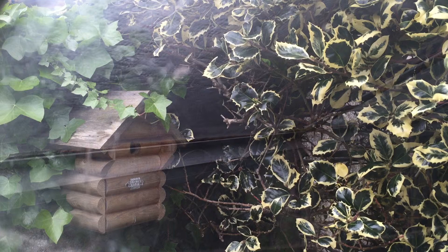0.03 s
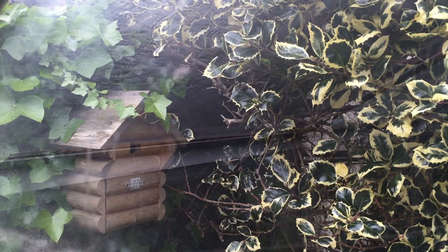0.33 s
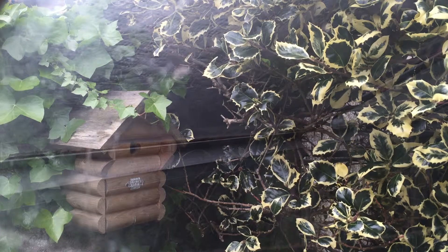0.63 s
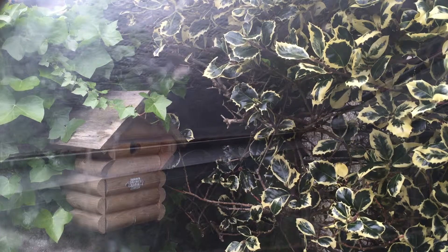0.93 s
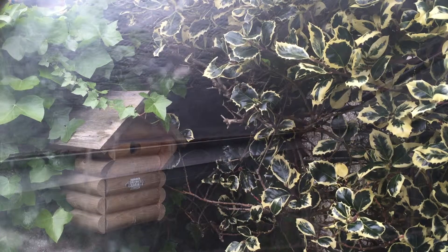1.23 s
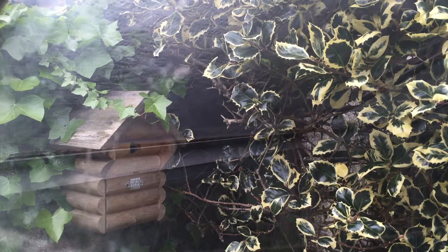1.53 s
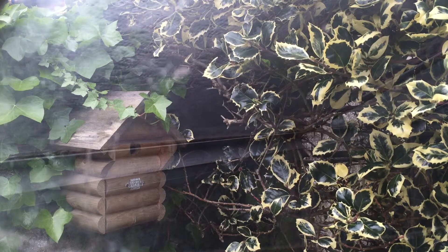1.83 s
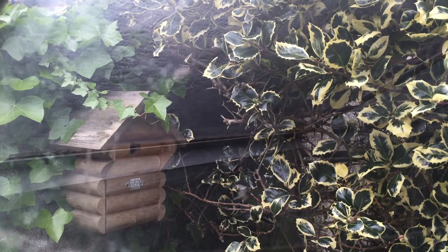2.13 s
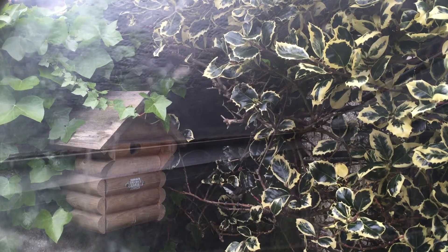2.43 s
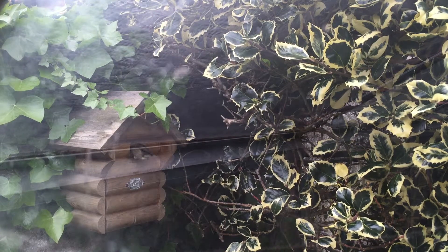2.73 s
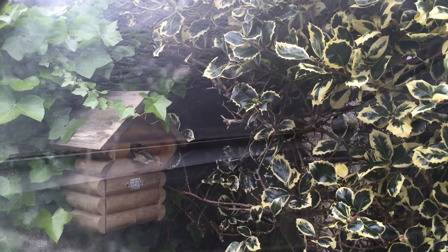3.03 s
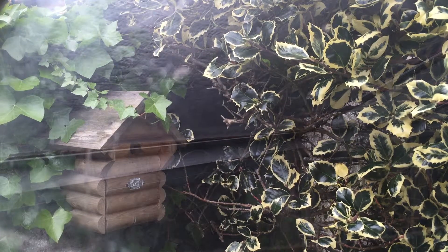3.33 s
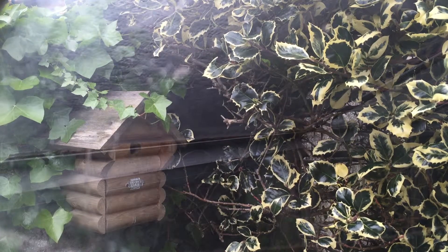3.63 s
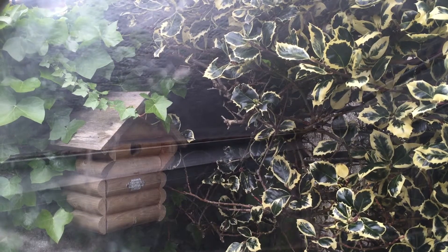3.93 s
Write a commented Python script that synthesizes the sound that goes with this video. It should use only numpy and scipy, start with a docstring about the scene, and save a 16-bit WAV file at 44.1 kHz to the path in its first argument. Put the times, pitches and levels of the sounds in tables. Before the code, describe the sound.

A small bird chirps loudly once, then fainter peeps follow over a low garden rumble.

```python
"""A leafy garden: low rumble, soft hiss and a distant engine droning throughout; two faint hums early on.
Quick two-voiced trills start in the bushes; at 0.35 s a small bird close by gives one loud, scooping chirp.
Faint peeps follow, a far bird whistles once at 1.2 s, and hoarse far calls begin as the engine sags.
The engine recovers; an arched chirp at 2.8 s leads into soft, high chatter under the last peeps."""
import sys
import numpy as np
from scipy import signal
from scipy.fft import rfft, irfft, next_fast_len
from scipy.io import wavfile
from scipy.ndimage import uniform_filter1d, map_coordinates

SR = 44100
rng = np.random.default_rng(int(sys.argv[2]) if len(sys.argv) > 2 else 0)


def waveform_to_disk(signal):
    """Save audio, clipped to [-1, 1], as 16-bit WAV at the path in sys.argv[1]."""
    frames = np.transpose(np.atleast_2d(signal))
    scaled = np.clip(frames, -1, 1) * 32767
    samples = np.round(scaled).astype(np.int16)
    wavfile.write(sys.argv[1], SR, samples)


N = 176400
T = np.arange(N) / SR


def amp(db):
    """dB to gain."""
    return 10 ** (np.asarray(db) / 20)


def unit(x):
    """Scale to rms 1."""
    return x / np.sqrt(np.mean(x ** 2) + 1e-20)


def curves(rows):
    """Per-sample curve for each column after the time."""
    times, *columns = np.transpose(rows)
    return [np.interp(T, times, column) for column in columns]


def during(rows):
    """Gate over a table's time span, 2 ms edges."""
    return np.clip(np.minimum(T - rows[0][0], rows[-1][0] - T) * 500, 0, 1)


def wobble(rate_hz, size=N):
    """Smooth random curve, rate_hz knots a second."""
    position = np.arange(size) * rate_hz / SR
    knots = np.random.default_rng(rng.integers(2 ** 31)).standard_normal(int(position[-1]) + 4)
    return map_coordinates(knots, [position])


def filtered(x, response):
    """Apply a gain given as a function of Hz."""
    size = next_fast_len(N + SR // 2)
    return irfft(rfft(x, size) * response(np.fft.rfftfreq(size, 1 / SR)), size)[:N]


def noise(spectrum, patchy_db):
    """Coloured noise, rms 1, with random gain patches in time and frequency."""
    bins = signal.stft(rng.standard_normal(N), nperseg=512)[2]
    patches = uniform_filter1d(rng.standard_normal(bins.shape), 7, axis=0)
    patches = uniform_filter1d(patches, 16, axis=1)
    patchy = signal.istft(bins * amp(patchy_db * unit(patches)), nperseg=512)[1][:N]
    knots_hz, db = np.transpose(spectrum)
    return unit(filtered(patchy, lambda hz: amp(np.interp(np.log(hz + 1), np.log(knots_hz), db))))


def tone(hz, rough=0, rate_hz=1):
    """Gliding sine, rms about 1; the power share `rough` flutters randomly at rate_hz."""
    phase = 2 * np.pi * np.cumsum(hz) / SR
    flutter = wobble(rate_hz, len(hz)) * np.sin(phase) + wobble(rate_hz, len(hz)) * np.cos(phase)
    return np.sqrt(2 * (1 - rough)) * np.sin(phase) + np.sqrt(rough) * flutter


def note(length_s):
    """Progress 0-1 and half-sine envelope."""
    progress = np.linspace(0, 1, max(int(length_s * SR), 2))
    return progress, np.sin(np.pi * progress)


def add(out, start_s, x):
    """Mix x into out at start_s."""
    part = out[max(round(start_s * SR), 0):][:len(x)]
    part += x[:len(part)]


def held_notes(rows, rough, rate_hz, swell_power=1):
    """Swelling notes of constant pitch; rows: t/s, length/s, f/Hz, level/dB."""
    out = np.zeros(N)
    for start_s, length_s, hz, db in rows:
        _, swell = note(length_s)
        add(out, start_s, amp(db) * swell ** swell_power * tone(np.full(len(swell), hz), rough, rate_hz))
    return out


# rumble spectrum: f/Hz, relative level/dB
RUMBLE_SPECTRUM = [(20, -31), (35, -15.5), (60, -4), (110, 1), (170, 3), (245, -0.5), (300, -12.5),
                   (450, -15.5), (700, -22.5), (1200, -43)]
# rumble envelope: t/s, level/dB
RUMBLE_ENVELOPE = [(.1, -55.5), (.55, -59.5), (1, -56.5), (1.7, -58), (2.4, -56.5), (3.05, -60.5),
                   (3.45, -56.5), (3.8, -59)]


def rumble():
    """Far, low noise, slowly rising and falling."""
    db, = curves(RUMBLE_ENVELOPE)
    return amp(db + .39 * wobble(6)) * noise(RUMBLE_SPECTRUM, patchy_db=2.38)


# hiss spectrum: f/Hz, relative level/dB
HISS_SPECTRUM = [(300, 6.5), (1000, 3), (2000, 1), (3200, -1.5), (5000, -5), (7500, -7), (10300, -12.5),
                 (12000, -11.5), (15000, -14.5)]


def hiss(level_db=-73):
    """Soft, nearly steady outdoor noise."""
    return amp(level_db + .16 * wobble(3.302)) * noise(HISS_SPECTRUM, patchy_db=1.8)


# firing rate: t/s, f/Hz
FIRING_RATE = [(0.08, 110.7), (0.25, 110.9), (0.32, 108.1), (0.85, 108), (1.33, 105.4), (1.85, 96.1),
               (2.03, 96.2), (2.11, 101.7), (2.21, 101), (2.4, 106.1), (2.66, 107.2), (2.95, 110.4),
               (3.35, 110), (3.42, 107.1), (3.92, 106), (4.0, 103.7)]
# engine envelopes before trims and resonance: t/s, firing level/dB, octave level/dB
ENGINE_ENVELOPES = [(0.08, -53, -44), (0.26, -49, -51), (0.33, -56, -45), (0.5, -48, -55),
                    (0.69, -51.5, -52), (0.85, -47, -45), (1.3, -48, -54.5), (1.35, -45, -48),
                    (1.98, -51.5, -53), (2.07, -55.5, -49), (2.23, -47.5, -54.5), (2.69, -47.5, -53),
                    (3.06, -56.5, -60), (3.41, -54.5, -45), (3.44, -51.5, -64), (3.51, -41, -51.5),
                    (3.59, -51, -44), (3.7, -48.5, -69), (3.84, -53, -56), (3.89, -50.5, -61),
                    (3.96, -47.5, -47), (4.0, -46, -67)]
# weak upper orders: multiple of firing rate, base level/dB
UPPER_ORDERS = [(3, -72.5), (4, -73.5), (5, -83.5), (6, -87)]
# their shared envelope: t/s, relative level/dB
UPPER_ENVELOPE = [(.08, 1), (.3, 4), (.55, -2), (.8, 2), (1.05, 0), (1.25, 6.5), (1.7, -7.5), (2.03, 2.5),
                  (2.35, -3.5), (2.8, -3), (3.35, -1), (4, -4)]
FIRING_TRIM_DB, OCTAVE_TRIM_DB = .02, -2
OCTAVE_PEAK_HZ, OCTAVE_HALF_WIDTH_HZ = 227.2, 23
BOOM_HZ, BOOM_DB = 222, -58
LABOUR_DB_PER_HZ = .87


def engine():
    """Firing tone and orders follow one speed; the octave peaks near a resonance rung by roughness."""
    hz, = curves(FIRING_RATE)
    firing_db, octave_db = curves(ENGINE_ENVELOPES)
    upper_db, = curves(UPPER_ENVELOPE)
    firing = amp(firing_db + FIRING_TRIM_DB) * tone(hz, rough=.05, rate_hz=14)
    resonance = 1 / np.hypot(1, (2 * hz - OCTAVE_PEAK_HZ) / OCTAVE_HALF_WIDTH_HZ)
    octave = amp(octave_db + OCTAVE_TRIM_DB) * resonance * tone(2 * hz, rough=.13, rate_hz=30)
    boom = amp(BOOM_DB) * tone(np.full(N, BOOM_HZ), rough=.99, rate_hz=28)
    out = firing + octave + boom
    labour_db = LABOUR_DB_PER_HZ * (hz.mean() - hz)  # third order hardens as the engine slows
    for order, base_db in UPPER_ORDERS:
        db = base_db + upper_db + labour_db * (order == 3)
        out += amp(db) * tone(order * hz, rough=.88, rate_hz=18)
    return out


# hums: t/s, length/s, f/Hz, level/dB
HUM_NOTES = [(0.021, 0.36, 356.4, -65.5), (0.654, 0.4, 553, -74.5)]


def hums():
    """Brief, wavering low tones far off."""
    return held_notes(HUM_NOTES, rough=.24, rate_hz=16)


# trills: t/s, length/s, low voice level/dB, high voice level/dB
TRILL_RUNS = [(0.058, 0.072, -74, -78), (.567, .088, -77, -77.5), (0.872, 0.047, -74, -77.5),
              (1.273, .115, -83, -88), (1.568, .118, -73.5, -70.5), (1.849, 0.12, -76, -81),
              (2.545, 0.19, -78, -87), (3.705, 0.096, -73.5, -80)]
TRILL_LOW_HZ, TRILL_HIGH_HZ, TRILL_RISE_HZ_PER_S = 5056, 7900, 1800
TRILL_STEP_S, TRILL_GLIDE_HZ, TRILL_SCATTER_HZ, TRILL_SCATTER_DB = .029, 175, 44.8, 2.9


def trills():
    """Runs of uneven notes creep upward; within a note the low voice rises, the high one falls."""
    out = np.zeros(N)
    for start_s, length_s, low_db, high_db in TRILL_RUNS:
        progress, swell = note(length_s)
        t = progress * length_s
        beat = t / TRILL_STEP_S % 1
        pulses = np.sqrt(np.abs(swell)) * np.sin(np.pi * beat) ** 2
        for base_hz, db, direction in (TRILL_LOW_HZ, low_db, 1), (TRILL_HIGH_HZ, high_db, -1):
            glide_hz = TRILL_RISE_HZ_PER_S * t + direction * TRILL_GLIDE_HZ * (beat - .5)
            hz = base_hz + glide_hz + TRILL_SCATTER_HZ * wobble(35, len(t))
            gain = amp(db + TRILL_SCATTER_DB * wobble(44, len(t)))
            add(out, start_s, gain * pulses * tone(hz, rough=.24, rate_hz=500))
    return out


# chirp pitch: t/s, f/Hz
CHIRP_GLIDE = [(.35, 8250), (.366, 7900), (.378, 7400), (.396, 6750), (.416, 6350), (.448, 6150),
               (.478, 6260), (.5, 6610), (.519, 6950), (.531, 7020), (.535, 5750), (.541, 5150)]
# fundamental envelope: t/s, level/dB
CHIRP_ENVELOPE = [(.348, -83), (.36, -69.5), (.388, -54), (.415, -52), (.43, -43.5), (.455, -46.5),
                  (.47, -41.5), (.512, -50.5), (.527, -40.5), (.534, -50), (.543, -82)]
# octave envelope: t/s, level/dB
CHIRP_OCTAVE_ENVELOPE = [(.35, -90), (.375, -73), (.397, -66), (.43, -95), (.472, -89), (.49, -71),
                         (.514, -74), (.535, -94)]
QUAVER_HZ, QUAVER_DB, QUAVER_END_S = 85, 4.5, .54


def loud_chirp():
    """A pure whistle, shaky at first, scoops down, rises and ends in a downward flick."""
    hz, = curves(CHIRP_GLIDE)
    db, = curves(CHIRP_ENVELOPE)
    octave_db, = curves(CHIRP_OCTAVE_ENVELOPE)
    hz = uniform_filter1d(hz, size=180) + 18 * wobble(350)
    depth_db = np.interp(T, [CHIRP_ENVELOPE[0][0], QUAVER_END_S], [QUAVER_DB, 0])
    quaver_db = depth_db * np.sin(2 * np.pi * QUAVER_HZ * T)
    return during(CHIRP_ENVELOPE) * (amp(db + quaver_db) * tone(hz) + amp(octave_db) * tone(2 * hz))


def scratch(size, centre_hz=6200, gain_db=.5):
    """Broad hiss in a hoarse call."""
    return amp(gain_db) * tone(np.full(size, centre_hz), rough=.96, rate_hz=7200)


# peeps: t/s, length/s, start f/Hz, end f/Hz, level/dB, second voice ratio, its gain/dB, hoarseness 0-1
PEEP_NOTES = [(0.895, 0.037, 4180, 4350, -76, 1.4, -8, 0.4), (0.976, 0.028, 4090, 4250, -74, 1.65, -7, 0.3),
              (1.136, 0.029, 4714, 4910, -70.5, 1.2, -10, 0), (1.15, 0.031, 6630, 6650, -76, 1.2, -20, .05),
              (1.175, .028, 5400, 5100, -79, 0.82, 2, .7), (1.387, .025, 4200, 4350, -79.5, 1.62, -1, .3),
              (1.487, 0.021, 4280, 4400, -77, 1.6, -4, 0.2), (2.313, 0.025, 4800, 4600, -82, 1.2, -2, .6),
              (2.51, .035, 4310, 4596, -80, 1.53, 2, .5),
              (2.986, 0.036, 3949, 4540, -70.5, 2.06, -6.5, .25),
              (3.068, .036, 4060, 4600, -75.5, 2, -1, 0.5), (3.125, .032, 3600, 3820, -76.5, 2, 2, .3),
              (3.237, 0.06, 3864, 4035, -71, 2, 2.5, 0.15), (3.25, 0.037, 5260, 5300, -75, 1.26, -11, .05),
              (3.287, 0.027, 4170, 4310, -76.5, 1.42, 2, 0.2),
              (3.352, 0.064, 4400, 4160, -76, 1.72, -5, 0.9), (3.477, .04, 4390, 4588, -75, 1.61, -6, 0.61),
              (3.508, .036, 3740, 4400, -73, 2.1, -14, .3),
              (3.909, 0.027, 6220, 6400, -72.5, 1.65, -12, 0.2)]
RASP_RATE_HZ = 760


def peeps():
    """Short two-voiced glides; hoarseness blurs the pitch and adds scratch."""
    out = np.zeros(N)
    for start_s, length_s, start_hz, end_hz, db, ratio, second_db, hoarse in PEEP_NOTES:
        progress, swell = note(length_s)
        hz = start_hz + (end_hz - start_hz) * progress
        first, second = [tone(k * hz, rough=.6 * hoarse, rate_hz=k * RASP_RATE_HZ) for k in (1, ratio)]
        call = first + amp(second_db) * second + np.sqrt(hoarse) * scratch(len(hz))
        add(out, start_s, amp(db) * swell * call)
    return out


def far_whistle(start_s=1.215, length_s=.28, hz=2494, db=-75.5):
    """One held note from a distant bird swells and fades."""
    return held_notes([(start_s, length_s, hz, db)], rough=.2, rate_hz=90, swell_power=2)


# far calls: t/s, length/s, f/Hz, level/dB
FAR_CALL_NOTES = [(1.76, 0.16, 2380, -80), (2.6, 0.066, 2570, -80.5), (2.68, 0.082, 2244, -80),
                  (2.8, 0.16, 2320, -82.5), (3.68, .26, 2037, -80.5)]


def far_calls():
    """Hoarse bird calls, blurred by distance into soft rasps."""
    return held_notes(FAR_CALL_NOTES, rough=1, rate_hz=520.8)


# arched chirp: t/s, f/Hz, level/dB
ARCH_CONTOUR = [(2.783, 6300, -87), (2.793, 6694, -68), (2.803, 7310, -69.5), (2.82, 7200, -75),
                (2.842, 6800, -63), (2.853, 6560, -82)]


def arched_chirp(high_ratio=1.192, high_gain_db=-9):
    """Two scratchy voices rise and fall together."""
    hz, db = curves(ARCH_CONTOUR)
    low, high = [tone(k * hz, rough=.34, rate_hz=RASP_RATE_HZ) for k in (1, high_ratio)]
    envelope = during(ARCH_CONTOUR) * amp(db + 2 * wobble(120))
    return envelope * (low + amp(high_gain_db) * high + .25 * scratch(N))


def chatter(from_s=2.99, to_s=3.95, count=40, centre_hz=7740, mean_db=-83):
    """Tiny high notes, scattered in time, pitch, glide and level."""
    out = np.zeros(N)
    progress, swell = note(length_s=.025)
    scatter = rng.standard_normal((count, 4))
    for start_s, (late, pitch, glide, strength) in zip(np.linspace(from_s, to_s, count), scatter):
        hz = centre_hz * np.exp(.077 * pitch + .04 * glide * progress)
        voice = tone(hz, rough=.68, rate_hz=RASP_RATE_HZ)
        add(out, start_s + .017 * late, amp(mean_db + 2 * strength) * swell * voice)
    return out


# echoes off near surfaces: delay t/s, relative level/dB
ECHOES = [(.0047, -14), (.0098, -10), (0.015, -39), (.024, -15), (.043, -25)]


def garden(x, wet_db, t60_s=.25, build_s=.0035):
    """Direct sound, near echoes and a short scatter from the foliage."""
    t = T[:SR // 2]
    tail = rng.standard_normal(len(t)) * amp(-60 * t / t60_s) * (1 - np.exp(-t / build_s))
    response = amp(wet_db) * tail / np.linalg.norm(tail)
    response[0] = 1
    for delay_s, db in ECHOES:
        add(response, delay_s, amp([db]))
    return signal.fftconvolve(x, response)[:N]


def scene():
    """Mono mix: birds with garden echoes, over engine and background."""
    faint_birds = peeps() + arched_chirp() + trills() + chatter() + far_whistle() + far_calls()
    birds = garden(loud_chirp(), wet_db=-10) + garden(faint_birds, wet_db=-17)
    return (birds + engine() + rumble() + hums() + hiss())[None]


ONSET_S, FADE_IN_S, CUTOFF_HZ = .072, .002, 15300


def record(dry):
    """Brief silence, fast fade-in, brick-wall low-pass."""
    fade_in = np.clip((T - ONSET_S) / FADE_IN_S, 0, 1)
    return filtered(dry[0] * fade_in, lambda hz: hz < CUTOFF_HZ)[None]


dry = scene()
out = record(dry)
waveform_to_disk(out)
```